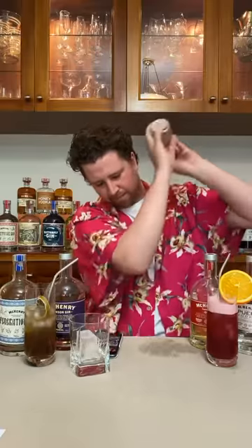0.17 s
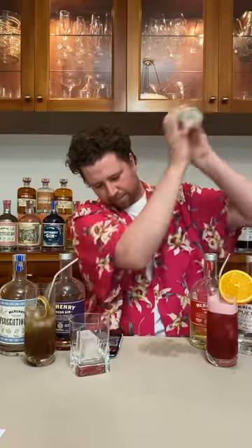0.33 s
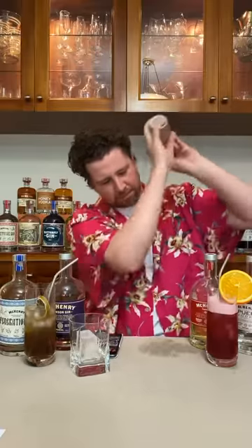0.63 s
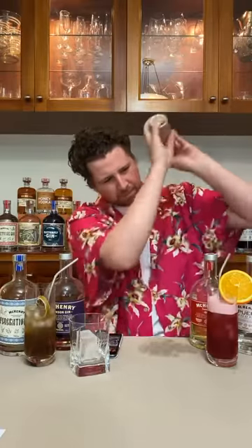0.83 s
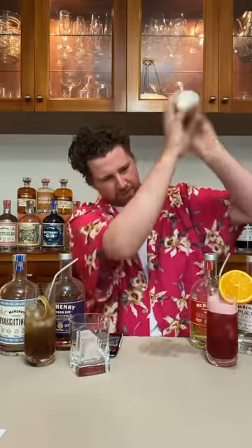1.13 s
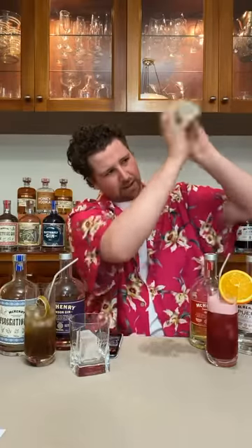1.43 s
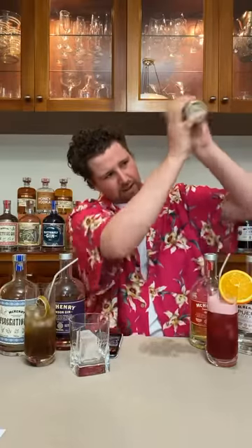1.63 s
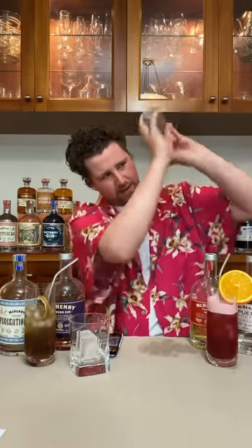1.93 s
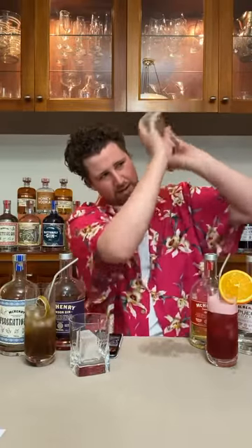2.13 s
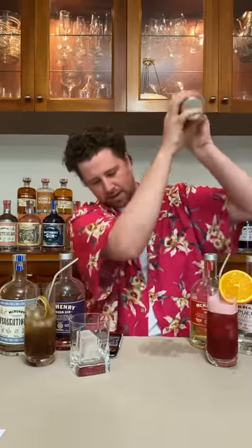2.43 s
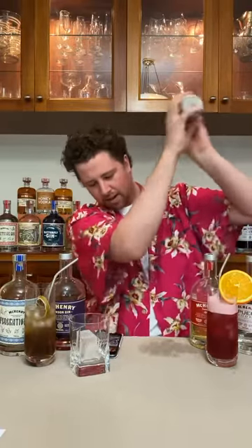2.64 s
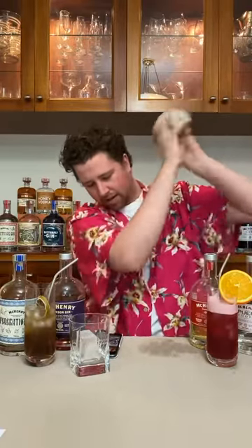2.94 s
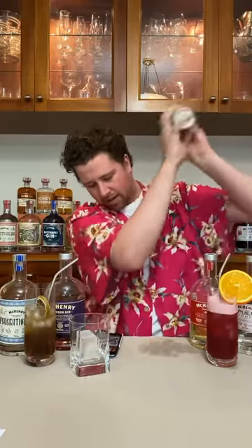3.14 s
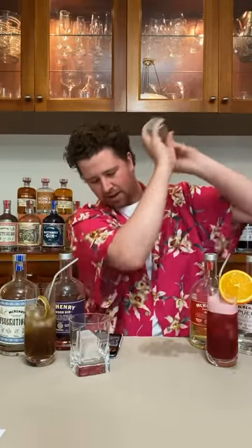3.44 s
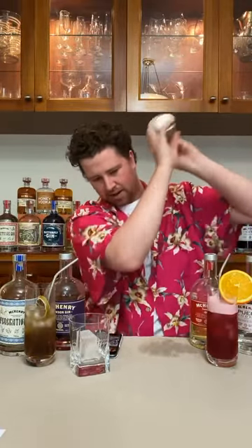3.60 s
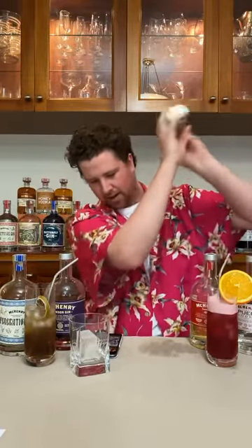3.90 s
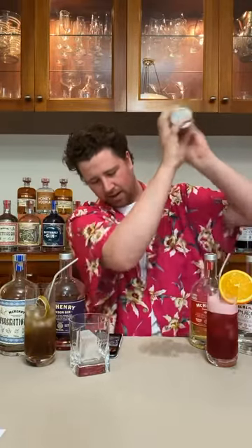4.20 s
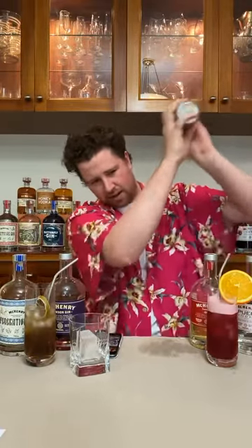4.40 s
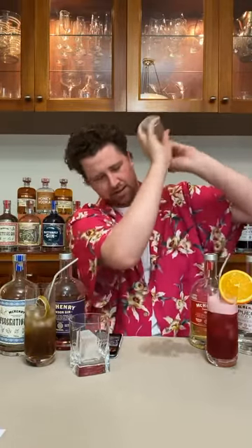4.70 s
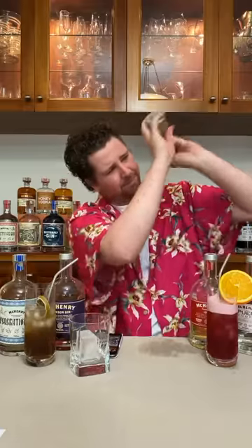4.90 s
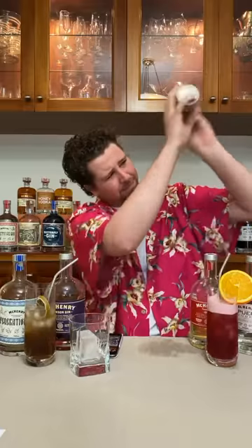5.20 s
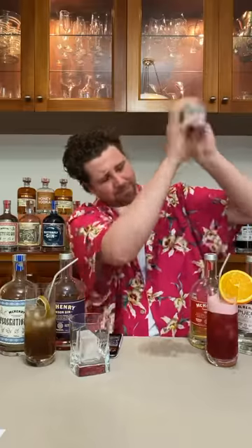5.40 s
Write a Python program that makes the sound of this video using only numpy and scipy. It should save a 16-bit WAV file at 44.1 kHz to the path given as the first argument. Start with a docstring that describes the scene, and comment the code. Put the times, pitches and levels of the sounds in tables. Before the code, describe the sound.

A steel cocktail shaker full of ice and liquid is shaken by hand, about nine strokes a second, without a pause. Sharp clacks and chinks of cubes stand out from a bright rattle, with hollow slaps of the drink underneath. The strokes vary a little in force and the last is weaker. It is heard from nearby in a small room with a brief echo and faint low rumble.

```python
"""In a small hard room, ice is shaken hard in a steel cocktail shaker, about nine throws a second.
At each end of a throw the load lands: small pieces rattle, the drink slaps the cup with a dull thud,
and big cubes clack on the steel wall. Between throws the ice slides along the wall.
The room adds a short echo, a faint hiss and a low rumble."""
import sys
import numpy as np
from scipy import signal
from scipy.io import wavfile

SR = 44100
rng = np.random.default_rng(int(sys.argv[2]) if len(sys.argv) > 2 else 0)


def int16_out(signal):
    """Quantize to a 16-bit WAV file."""
    q = np.round(np.clip(np.atleast_2d(signal).T, -1, 1) * 32767)
    wavfile.write(sys.argv[1], SR, q.astype(np.int16))


N = 244746

# Each landing of the load. A fade, here and below, is the time to die away by 60 dB.
# t/s, rattle level/dB, rise/s, fade/s, hardness of the slap (higher is harder)
THROWS = [(0.029, -22, 0.0078, 0.21, -20), (0.15, -23.5, 0.0031, 0.17, 0), (0.26, -23, 0.0033, 0.11, -7.5),
          (0.363, -22.5, 0.025, 0.15, -4.5), (0.467, -22, 0.0053, 0.4, -7),
          (0.575, -23.5, 0.014, 0.22, -8.5), (0.679, -22.5, 0.014, 0.22, -30),
          (0.81, -19.5, 0.0027, 0.15, -5), (0.902, -26.5, 0.021, 0.19, -16),
          (1.022, -23.5, 0.011, 0.31, -25), (1.121, -24.5, 0.0096, 0.25, -4),
          (1.209, -25, 0.05, 0.11, -0.5), (1.334, -24.5, 0.011, 0.24, -4), (1.436, -23, 0.023, 0.23, -9),
          (1.548, -26.5, 0.01, 0.47, -6), (1.671, -24, 0.0042, 0.21, -5), (1.761, -24.5, 0.011, 0.19, -6),
          (1.902, -23.5, 0.0075, 0.31, -8), (1.975, -26.5, 0.006, 0.34, -4.5),
          (2.08, -23.5, 0.023, 0.32, -8.5), (2.167, -25.5, 0.025, 0.33, -5), (2.31, -25, 0.0059, 0.23, -4),
          (2.389, -26.5, 0.0077, 0.39, -3.5), (2.511, -26, 0.02, 0.29, -3.5),
          (2.613, -25, 0.0077, 0.22, -5), (2.728, -24.5, 0.025, 0.21, -8),
          (2.834, -23.5, 0.0039, 0.2, -5.5), (2.941, -22, 0.017, 0.17, -8), (3.04, -24, 0.019, 0.28, -4),
          (3.149, -23, 0.034, 0.11, -5.5), (3.258, -22, 0.0063, 0.21, -5.5),
          (3.385, -22.5, 0.0025, 0.21, -4), (3.478, -25, 0.0062, 0.28, -10),
          (3.594, -21.5, 0.0096, 0.21, -5), (3.689, -23.5, 0.016, 0.37, -8),
          (3.831, -25, 0.0055, 0.44, -6.5), (3.906, -23, 0.007, 0.26, -11), (4.024, -25, 0.0079, 0.15, -2),
          (4.112, -21.5, 0.018, 0.14, -8), (4.235, -23, 0.0033, 0.27, -2), (4.322, -22, 0.0053, 0.28, -12),
          (4.437, -26, 0.026, 0.25, -5.5), (4.54, -23.5, 0.0067, 0.19, -8.5),
          (4.655, -21, 0.0099, 0.21, -3.5), (4.754, -24.5, 0.02, 0.33, -6),
          (4.878, -20.5, 0.0028, 0.27, -4), (4.991, -20.5, 0.0018, 0.16, -5), (5.08, -25, 0.047, 0.42, -8),
          (5.19, -24.5, 0.0018, 0.38, -23), (5.297, -26.5, 0.0051, 0.48, -7),
          (5.383, -33, 0.019, 0.22, -1.5)]


def from_db(db):
    """Turn decibels into a factor to multiply by."""
    return 10 ** (np.asarray(db) / 20)


def rms_one(x):
    """Scale a signal so that its average size (rms) is 1."""
    return x / np.sqrt(np.mean(x ** 2) + 1e-20)


def ring(clicks, hz, fade_s):
    """Each click starts a tone that dies away, like a tapped glass."""
    keep, turn = from_db(-60 / (fade_s * SR)), 2 * np.pi * hz / SR
    return signal.lfilter([0, np.sin(turn)], [1, -2 * keep * np.cos(turn), keep * keep], clicks + 1e-18)


def contacts(per_s, spread_db):
    """Tiny hits at random times; more spread makes a few much larger than the rest."""
    sizes = from_db(spread_db * np.minimum(rng.exponential(1, N), 4)) * rng.choice([-1, 1], N)
    return sizes * (rng.random(N) < per_s / SR)


def drift(per_s):
    """A smooth random wobble that changes about per_s times a second."""
    keep = np.exp(-2 * np.pi * per_s / SR)
    return rms_one(signal.lfilter([1], [1, -2 * keep, keep * keep], rng.standard_normal(N + SR))[SR:])


def background():
    """The room's faint hiss over a low rumble that comes and goes."""
    # Loudness of the rumble: t/s, level/dB
    rumble_levels = [(0.0, -57), (1.51, -61), (1.96, -60), (2.32, -56), (4.61, -66), (4.84, -61),
                     (5.55, -66)]
    hiss, rumble = rng.standard_normal((2, N))
    hiss = signal.sosfilt(signal.butter(1, [150, 2500], "band", fs=SR, output="sos"), hiss)
    rumble = signal.sosfilt(signal.butter(3, [36, 95], "band", fs=SR, output="sos"), rumble)
    rumble_gain = from_db(np.interp(np.arange(N) / SR, *np.transpose(rumble_levels)))
    return from_db(-58) * rms_one(hiss) + rumble_gain * rms_one(rumble)


def sliding():
    """How strongly the ice slides along the wall at each moment."""
    # Strength of the sliding: t/s, level/dB
    slide_levels = [(0.0, -27), (0.71, -26), (1.65, -29), (3.5, -27.5), (5.21, -29.5), (5.42, -31.5),
                    (5.55, -41.5)]
    return from_db(np.interp(np.arange(N) / SR, *np.transpose(slide_levels)))


def landings(level_db, fade_scale=1, late_s=0):
    """How strongly the load lands at each moment: every landing swells, then dies away."""
    t, power = np.arange(N) / SR, np.zeros(N)
    for (start_s, _, rise_s, fade_s, _), db in zip(THROWS, level_db):
        start = round((start_s + late_s) * SR)
        age = t[:min(N - start, SR // 2)]
        swell = np.minimum(age / rise_s, 1) ** 2
        dying = from_db(-60 * np.maximum(age - rise_s, 0) / (fade_s * fade_scale))
        power[start:start + len(age)] += (from_db(db) * swell * dying) ** 2
    return np.sqrt(power)


def ice_rattle(slide, pitch_count=140, ring_cycles=19.35, hollow_below_hz=2600):
    """Small pieces rub and tumble. Each hit rings at its own pitch; the low ones make a hollow knock."""
    # Tone of the small pieces, before a tilt toward the highs: f/Hz, level/dB
    tone_levels = [(900, -18), (1340, -9), (2160, -3.5), (2700, -13.5), (4000, -8), (6550, -5), (7800, -10),
                   (10000, -27), (12000, -19), (15200, -33)]
    # Extra strength of the hollow knock over the rattle: t/s, level/dB
    knock_levels = [(0.0, 1), (1.7, 2), (2.0, -0.5), (3.7, -2.5), (4.5, 0), (5.55, -3.5)]
    throw_s, rattle_db, *_ = np.transpose(THROWS)
    knock_db = rattle_db + np.interp(throw_s, *np.transpose(knock_levels))
    tumbling = from_db(-7) * rms_one(contacts(per_s=9000, spread_db=0))
    rubbing = from_db(-14.5) * slide * rms_one(contacts(per_s=12000, spread_db=0.5))
    # Pieces travel in clumps, so the hits come in uneven bursts.
    tumbling *= from_db(0.58 * drift(per_s=69))
    rubbing *= from_db(1.6 * drift(per_s=13))
    sharp = landings(rattle_db) * tumbling + rubbing
    hollow = landings(knock_db, fade_scale=1.32) * tumbling + rubbing
    pitch_of_hit = rng.integers(0, pitch_count, N)
    # The load keeps shifting, so each group of 14 pitches swells and sinks on its own.
    swells = [from_db(2.31 * drift(per_s=8)) for _ in range(pitch_count // 14)]
    tone_hz, tone_db = np.transpose(tone_levels)
    out = np.zeros(N)
    for k, hz in enumerate(np.geomspace(900, 15700, pitch_count)):
        gain = from_db(np.interp(np.log(hz), np.log(tone_hz), tone_db)) * hz / 1000
        hits = (hollow if hz < hollow_below_hz else sharp) * (pitch_of_hit == k)
        out += gain * ring(hits * swells[k // 14], hz, ring_cycles / hz)
    return out


def drink_slap(slide, deep_below_hz=600):
    """The drink and its ice beat the hollow cup in lumps; a harder slap brings out the deep tones."""
    # Hollow tones of the drink in the cup: f/Hz, level/dB, fade/s
    cup_tones = [(135, -34, 0.046), (217, -19, 0.059), (350, -20, 0.025), (459, 9, 0.02), (571, 5.5, 0.018),
                 (731, 10, 0.021), (893, 10, 0.022)]
    _, rattle_db, _, _, hardness = np.transpose(THROWS)
    deep = landings(rattle_db + 2.7 * hardness + 6, fade_scale=0.8, late_s=0.0013)
    shallow = landings(rattle_db + 1.67 * hardness + 1, fade_scale=0.89, late_s=0.0068)
    deep += from_db(-14) * slide
    shallow += from_db(-13.5) * slide
    out = np.zeros(N)
    for hz, db, fade_s in cup_tones:
        force = deep if hz < deep_below_hz else shallow
        lumps = rms_one(contacts(per_s=400, spread_db=3.5))
        out += from_db(db) * ring(force * lumps, hz, fade_s) / np.sqrt(fade_s * SR)
    return out


def weak_cube_hits(per_throw=3, mean_wait_s=0.018, softer_db_per_s=194):
    """List the weaker cubes that follow each landing by chance; later ones land more softly."""
    throw_s, rattle_db, rise_s, *_ = np.repeat(THROWS, per_throw, axis=0).T
    wait_s = rng.exponential(mean_wait_s, len(throw_s))
    level_luck, wall_luck, bright_luck = rng.standard_normal((len(throw_s), 3)).T
    hit_s = np.minimum(throw_s + rise_s / 2 + wait_s, (N - 1) / SR)
    hit_db = rattle_db + 14 + 2.5 * level_luck - softer_db_per_s * wait_s
    wall_db, bright_db = -5.5 + 5.5 * wall_luck, 5.5 * bright_luck
    return np.transpose([hit_s, hit_db, wall_db, bright_db])


def cube_clacks(bright_above_hz=5000, uneven_db=2.5, second_touch_s=0.0022, second_touch_db=-5.5):
    """Big cubes strike the steel. Each hit rings every tone with a strength of its own."""
    # The loudest cube hits: t/s, level/dB, extra wall ring/dB, brightness/dB
    loud_hits = [(0.0358, 4, -2, 11), (0.0491, 0, 3, -2), (0.153, -11, 5, 8), (0.1641, 2, -21, -5),
                 (0.2655, 2, -11, -13), (0.296, -4, -10, -8), (0.336, -9, -21, 16), (0.379, 1, -26, 3),
                 (0.4681, 5, -6, 25), (0.4836, -1.5, 0, -5), (0.4927, 0, 2, 4), (0.601, -5, 5, 11),
                 (0.605, -8, 2.5, 9), (0.6886, 4.5, -19, 14), (0.7058, -2, 2, 7), (0.7957, -3.5, -8, -10),
                 (0.813, 4, -24, -5), (0.921, -1, 3, 2.5), (1.0116, -5.5, -0.5, -6), (1.035, -7, -9, -4),
                 (1.0438, 0, -19, 0), (1.0502, 4, -16, -3.5), (1.1328, -5, 7.5, -11), (1.137, -1.5, 0.5, 0),
                 (1.156, -7, 10.5, -4), (1.2103, -3, -11, -9), (1.2509, 0.5, -24, 18), (1.2584, 9, -28, 13),
                 (1.349, -3, 1, 14), (1.3577, -7, 5.5, 13), (1.4438, -0.5, -8, -12), (1.4622, 2, -14, -14),
                 (1.563, -1.5, -6, 14), (1.5698, -1, 5.5, 4), (1.6794, -2, -4, -8), (1.7701, 1.5, 0, 7),
                 (1.7724, 1.5, -11, -11), (1.7812, -5, 5.5, -5), (1.9344, -4.5, -14, 2),
                 (1.9777, 0, -5, -1), (1.987, -1, -8, -1), (2.0756, -5, -15, 6), (2.108, 0.5, -24, -1),
                 (2.113, 2.5, -19, 17), (2.177, -9, 10, 5), (2.1936, -2, -3, -2), (2.319, -8, 2.5, 12),
                 (2.3636, -9, 4.5, 1), (2.4075, 0, 4, 7), (2.411, -1, -14, -16), (2.416, 2, -26, 1),
                 (2.618, 3.5, -7, 16), (2.6267, 1, -2, -15), (2.7415, -10, -12, 11), (2.8387, -0.5, 3, 1.5),
                 (2.8433, 1.5, 0.5, 12), (2.896, -2.5, -8, -14), (2.962, 0, -18, 16),
                 (3.057, 0.5, 5.5, -10), (3.0754, -0.5, -5, 10), (3.1552, -2.5, -19, -10),
                 (3.2713, 0, 2.5, 5), (3.296, 0.5, -20, 2), (3.3414, -2.5, -17, -7), (3.3926, 1, -14, -7),
                 (3.4905, 3.5, -4.5, -4), (3.7122, 2.5, -10, 1), (3.7228, 0.5, -4.5, 9),
                 (3.8359, -0.5, -3, -4.5), (3.9144, -1.5, 1.5, 7), (3.9293, -1.5, -2, 14),
                 (3.9386, -0.5, 0.5, 2), (4.0467, -2, 0, 18), (4.117, -2, -12, 6), (4.1273, 3.5, -2.5, 7),
                 (4.1368, -0.5, -15, -21), (4.237, -6.5, 10, -17), (4.3326, -2, -17, 0),
                 (4.343, -0.5, -1, 3), (4.547, -2, 3.5, 15), (4.665, -14, 7, 7), (4.7576, -7, 5.5, -9),
                 (4.774, -8, 6, 10), (4.789, -2, 2.5, -16), (4.799, 2.5, -12, -17), (4.8802, -9.5, 14, -9),
                 (4.957, 1.5, -14, 10), (4.9943, -0.5, -11, -16), (4.9965, 2, -3, -16),
                 (5.0032, -9, -11, -17), (5.0836, -6, -11, 0), (5.192, 2, -3, 3), (5.1971, 1.5, 2.5, -2),
                 (5.2087, -2.5, -12, 8), (5.2213, -6, 2, 11)]
    # Tones of the wall, cut short by the hands and the drink: f/Hz, level/dB, fade/s
    wall_tones = [(1150, -9.5, 0.026), (1323, -12.5, 0.07), (1513, -14.5, 0.047), (1688, -1.5, 0.009),
                  (1840, -4.5, 0.011), (2130, -10.5, 0.0077)]
    # Short chinks of the cubes and the rim: f/Hz, level/dB, fade/s
    chink_tones = [(2930, -8, 0.0018), (3480, -5.5, 0.0028), (4130, -5.5, 0.0048), (4580, -7.5, 0.0033),
                   (5270, -5, 0.0026), (5960, -1, 0.0022), (6680, -4.5, 0.0041), (6970, -2.5, 0.0043),
                   (7500, -9.5, 0.0038)]
    hit_s, hit_db, wall_db, bright_db = np.vstack([weak_cube_hits(), loud_hits]).T
    tones = wall_tones + chink_tones
    first = np.round(hit_s * SR).astype(int)
    first_luck = rng.standard_normal((len(first), len(tones)))
    # A cube has corners: a second edge touches just after the first, usually more softly.
    gap = (second_touch_s * SR * rng.uniform(.5, 2, len(first))).astype(int)
    second = np.minimum(first + gap, N - 1)
    second_luck = rng.standard_normal(first_luck.shape)
    out = np.zeros(N)
    for k, (hz, db, fade_s) in enumerate(tones):
        if k < len(wall_tones):
            extra_db = wall_db - 11
        else:  # Bright hits lose their low chinks, dull hits their high ones.
            extra_db = np.minimum(bright_db if hz > bright_above_hz else -bright_db, 0) - 3
        clicks, sign = np.zeros(N), (-1) ** (k // 2)
        clicks[first] = sign * from_db(hit_db + extra_db + db + uneven_db * first_luck[:, k])
        clicks[second] += clicks[first] * from_db(second_touch_db) * second_luck[:, k]
        out += ring(clicks, hz, fade_s)
    # Ice is soft against steel: each touch lasts long enough to lose the highest tones.
    return signal.sosfilt(signal.butter(3, 8200, fs=SR, output="sos"), out)


def room_echo(sound, fade_s=0.2, dull_above_hz=14000):
    """Sound bounces between the walls along ten paths, quieter and duller on every round."""
    out, dull = np.zeros(N), np.exp(-2 * np.pi * dull_above_hz / SR)
    for k, lag in enumerate((np.geomspace(.009, .031, num=10) * SR).astype(int)):
        path, state = sound.copy(), [0.]
        gain = from_db(-60 * lag / SR / fade_s)
        for i in range(lag, N, lag):
            bounce, state = signal.lfilter([gain * (1 - dull)], [1, -dull], path[i - lag:i], zi=state)
            path[i:i + lag] += bounce[:N - i]
        out += (path - sound) * (-1) ** k
    return out


def scene():
    """Add up the shaker, its echo and the background."""
    slide = sliding()
    cubes = cube_clacks()
    shaker = ice_rattle(slide) + drink_slap(slide) + cubes
    # A small body gives off little bass.
    shaker = signal.sosfilt(signal.butter(2, 199, "high", fs=SR, output="sos"), shaker)
    return (shaker + from_db(-18.5) * room_echo(shaker) + background())[None]


def record(dry):
    """The microphone's opening makes a dip in the treble; peaks are rounded and the very top is cut."""
    dip_hz, dip_width_hz, dip_db = 9980, 6050, -11
    peak_limit, top_hz = 0.82, 16800
    b, a = signal.iirpeak(dip_hz, dip_hz / dip_width_hz, fs=SR)
    heard = dry - (1 - from_db(dip_db)) * signal.lfilter(b, a, dry)
    rounded = heard / (1 + np.abs(heard / peak_limit) ** 6) ** (1 / 6)
    return signal.sosfilt(signal.cheby2(16, 90, top_hz, fs=SR, output="sos"), rounded)


dry = scene()
out = record(dry)
int16_out(out)
```